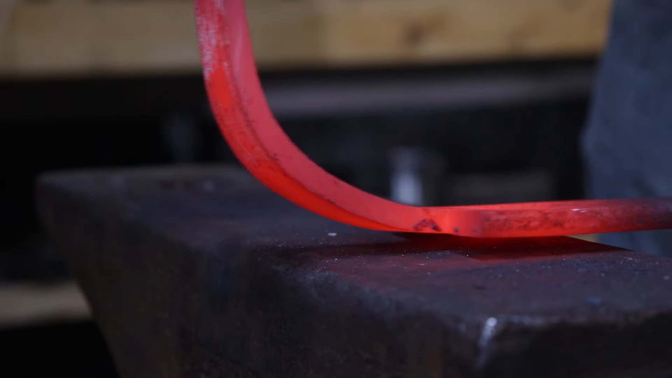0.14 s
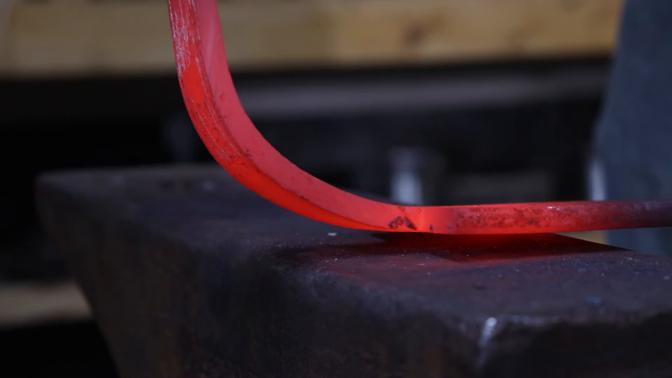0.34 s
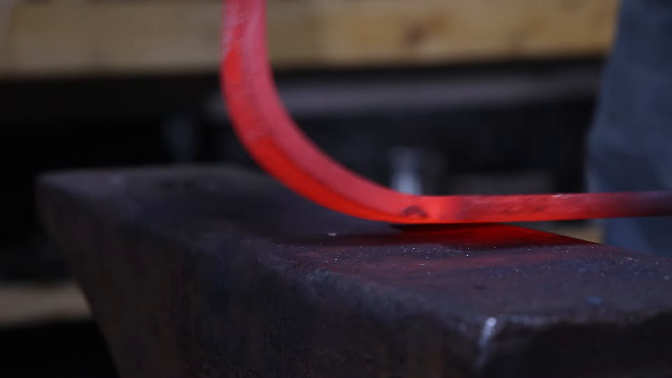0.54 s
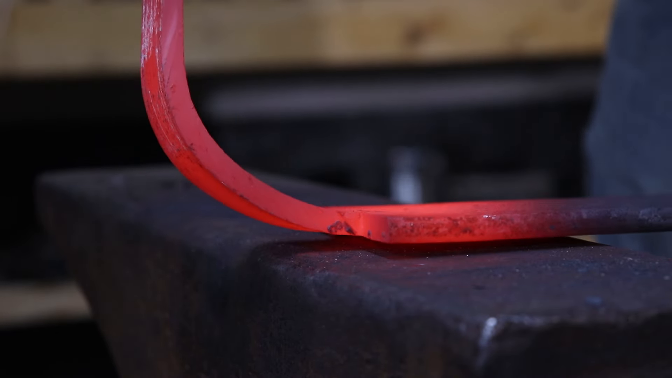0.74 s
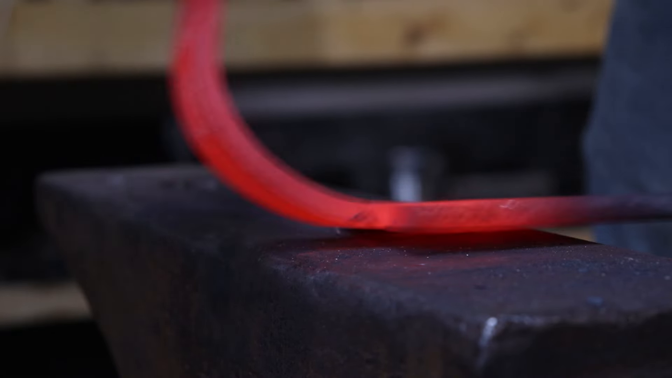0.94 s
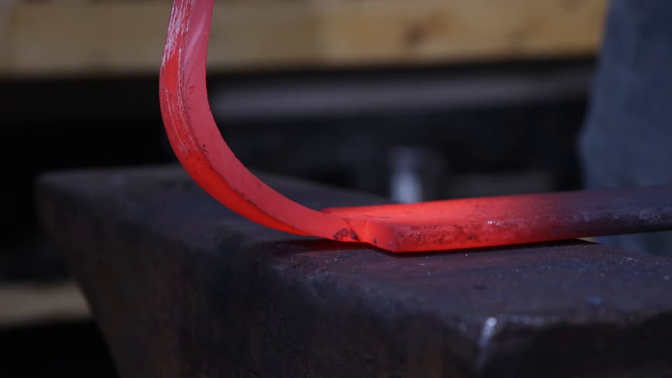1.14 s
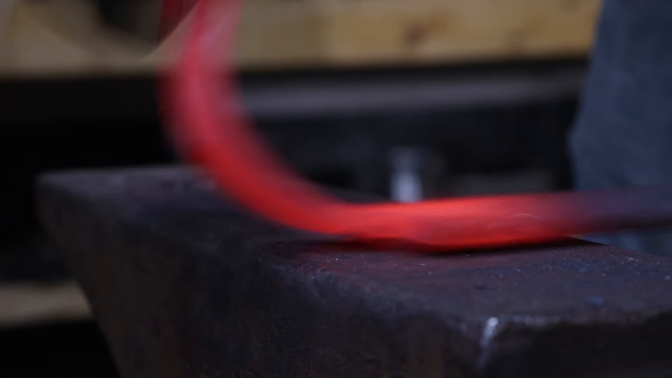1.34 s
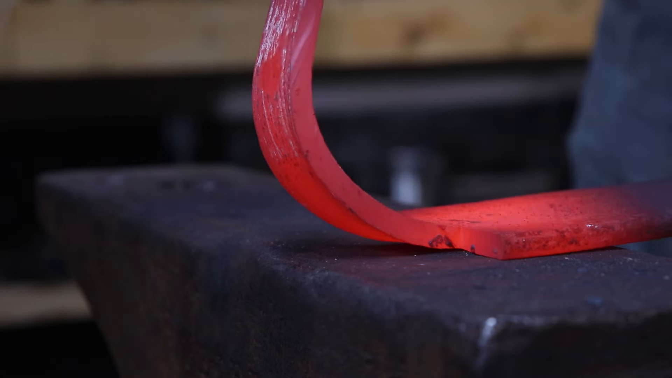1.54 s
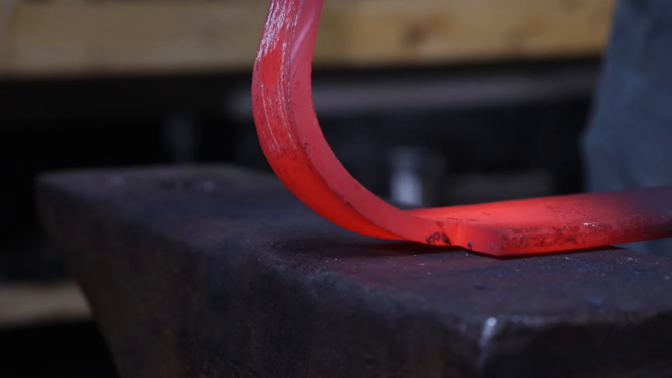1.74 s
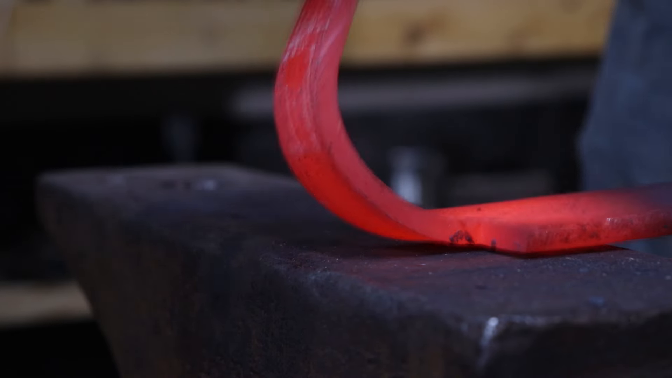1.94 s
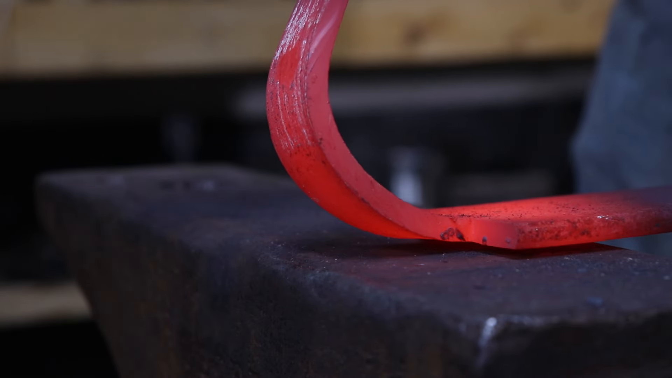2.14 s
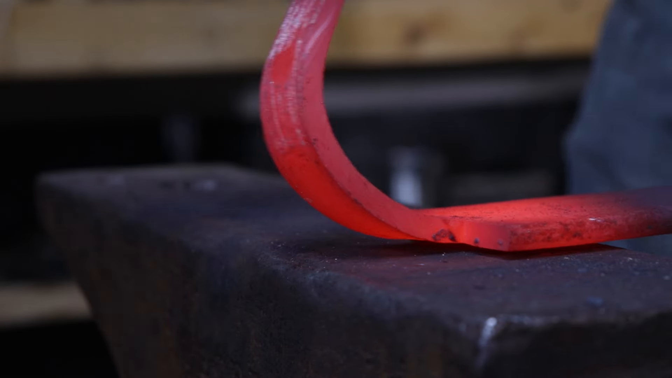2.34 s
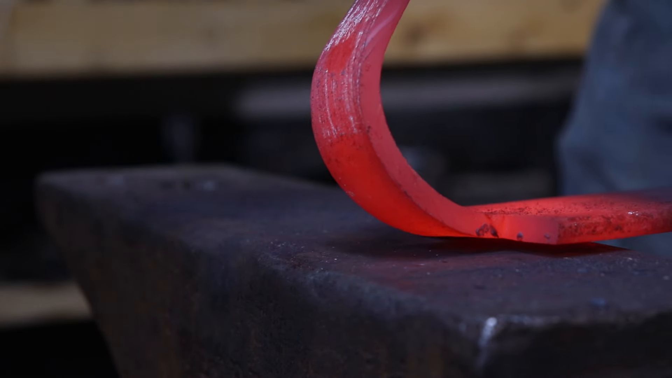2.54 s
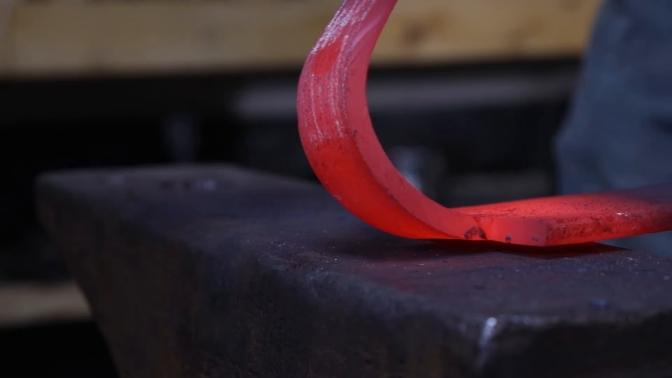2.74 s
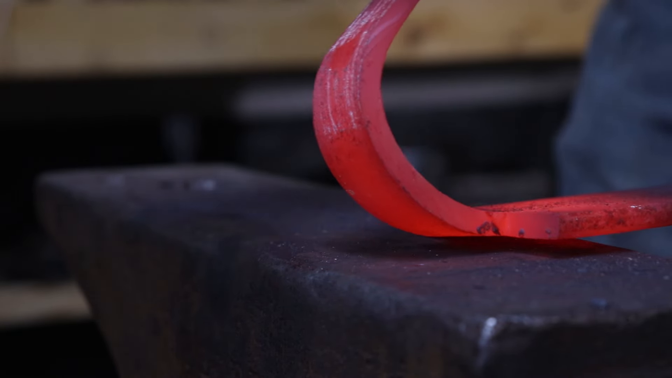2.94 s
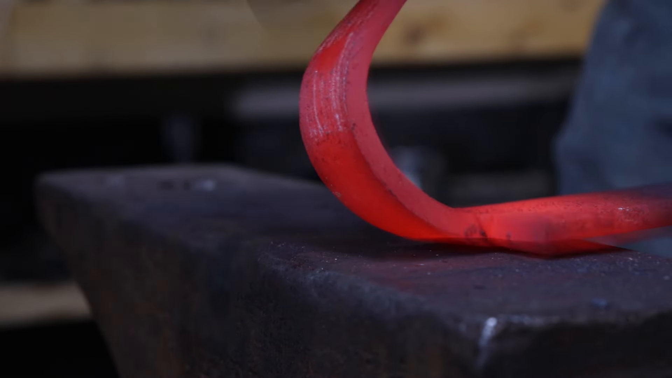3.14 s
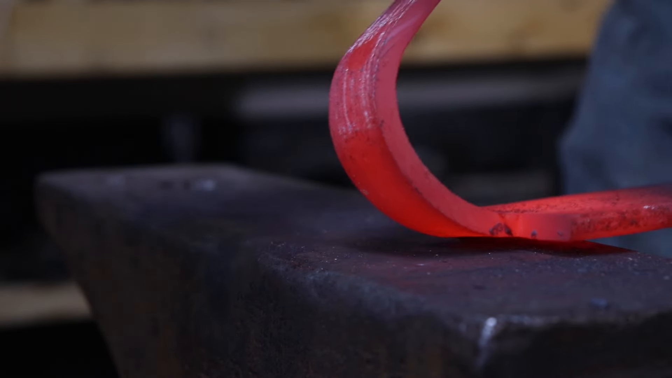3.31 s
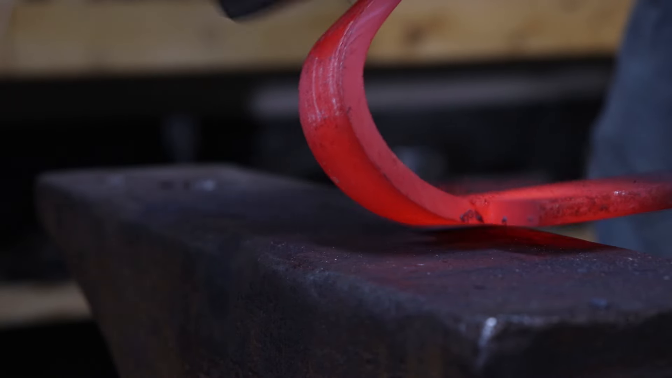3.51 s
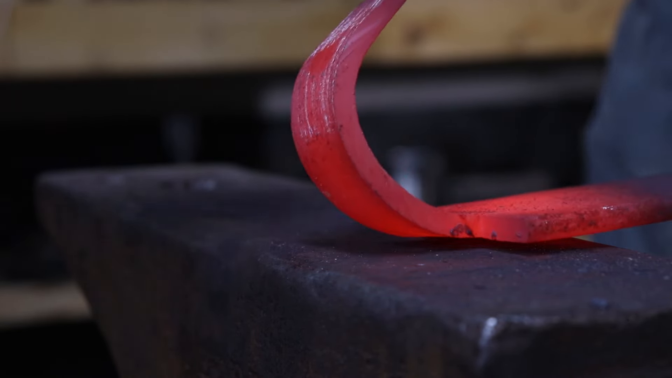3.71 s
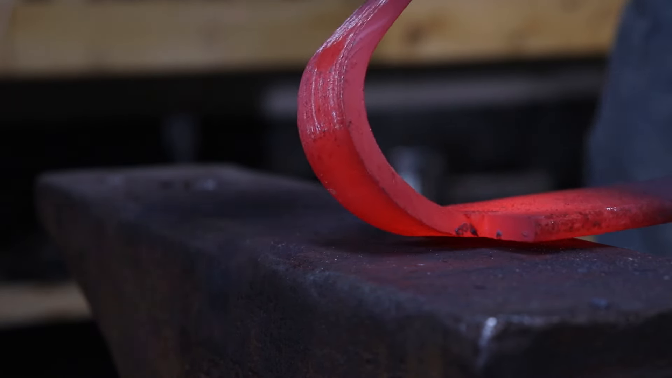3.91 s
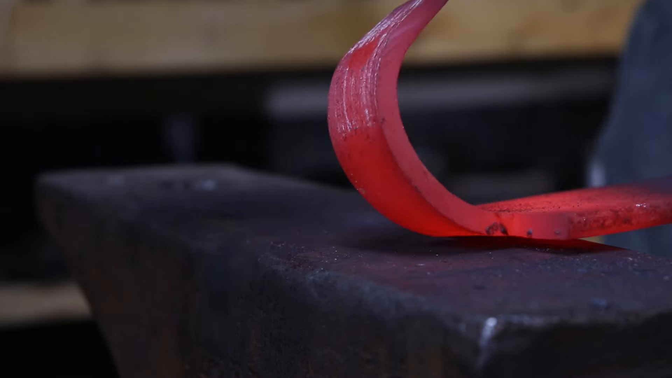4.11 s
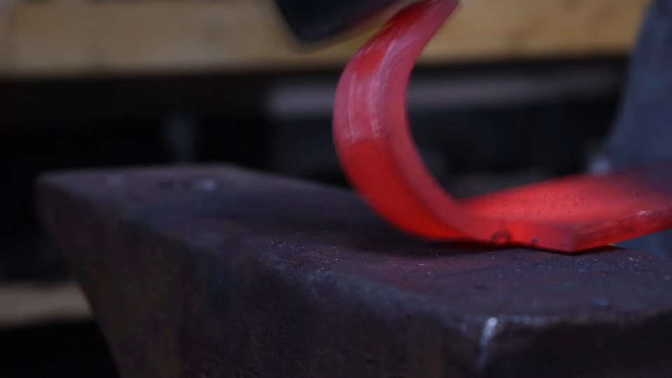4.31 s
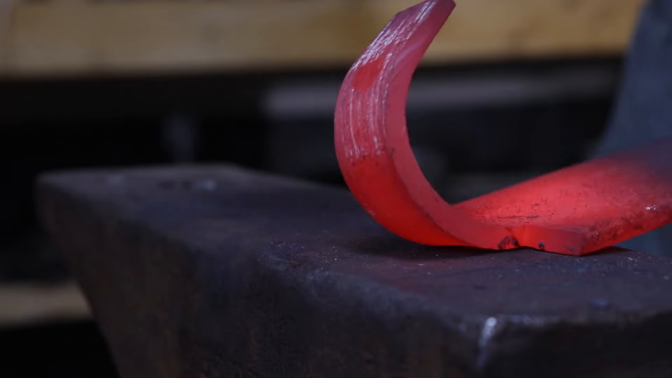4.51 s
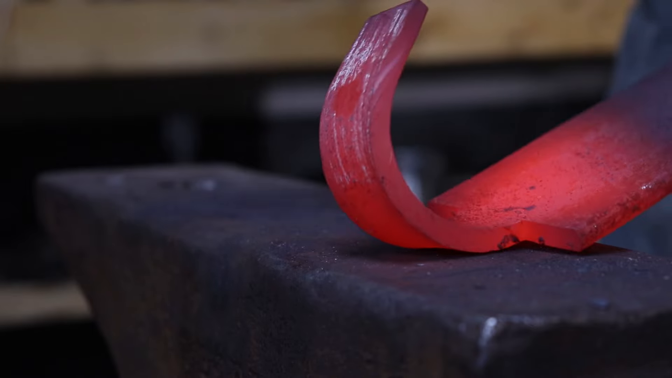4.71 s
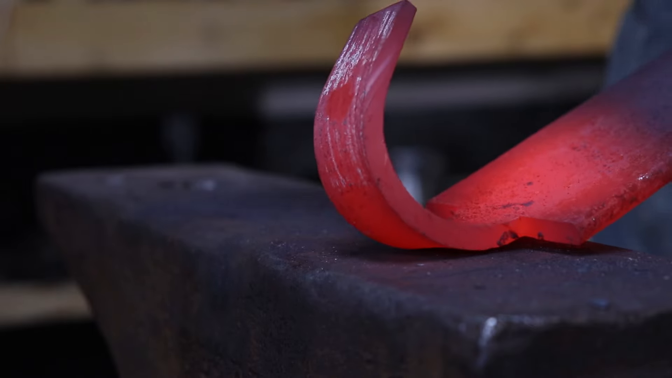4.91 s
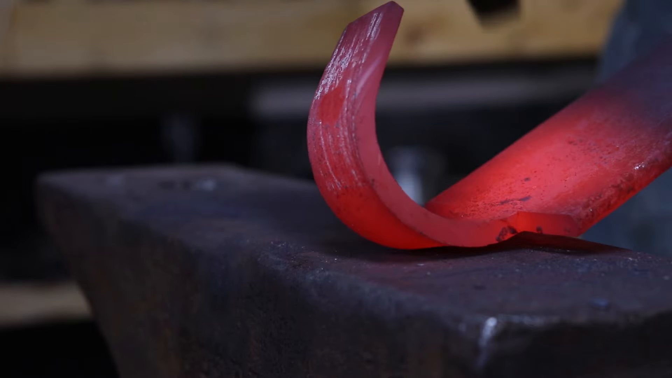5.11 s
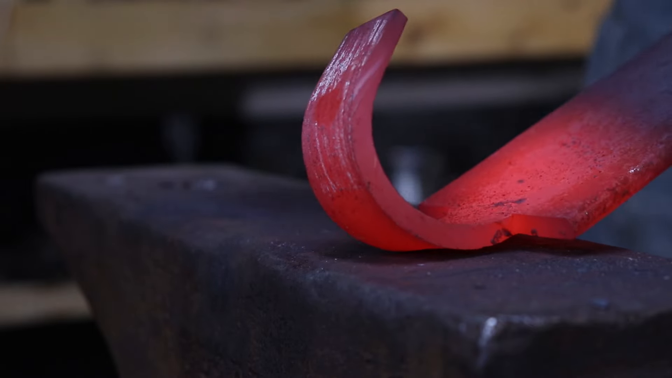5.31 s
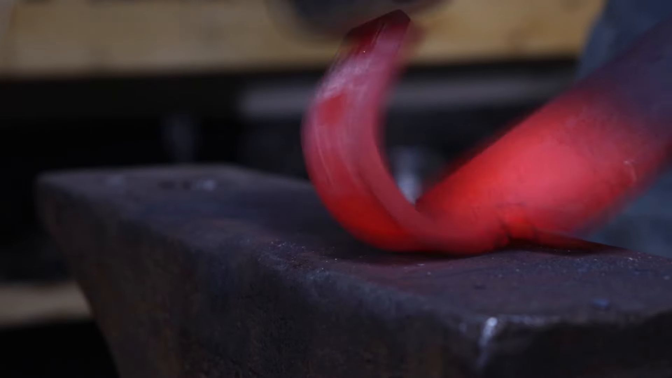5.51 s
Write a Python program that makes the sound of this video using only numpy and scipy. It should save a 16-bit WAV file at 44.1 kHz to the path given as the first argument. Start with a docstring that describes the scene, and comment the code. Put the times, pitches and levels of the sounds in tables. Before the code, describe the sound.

Close up in a small, quiet workshop with a short echo, a hammer hits steel on an anvil in a fairly even run. Every strike cracks brightly, thumps the stand and leaves a thin, high ring. The bar rattles against the anvil and softly knocks and scrapes as it is shifted. The sound cuts out for an instant on a few hits. After a brief gap with light ticks, a final blow lands with a rattle.

```python
"""A small workshop, close to one microphone: a hammer bends a hot steel bar on an anvil. Each blow is a crack,
a thud of the stand and the ring of the anvil; the bar bounces and chatters. Between blows the tongs knock and
the bar ticks and scrapes as it is moved, and the room adds short echoes. Some blows jar the microphone lead, so
that the sound drops out for a moment."""
import sys
import numpy as np
from scipy import signal
from scipy.fft import rfft, irfft
from scipy.io import wavfile

SR = 44100
rng = np.random.default_rng(int(sys.argv[2]) if len(sys.argv) > 2 else 0)


def persist_wave(psi):
    """Save psi, clipped to +-1, as 16-bit WAV."""
    counts = np.round(np.clip(psi, -1, 1) * 32767).astype(np.int16)
    wavfile.write(sys.argv[1], SR, np.atleast_2d(counts).T)


N = 245195

# Hammer blows. A fade time (t60) is how long a sound takes to fall by 60 dB.
# Each row: start in seconds, crack level in dB, thud level in dB, thud pitch in Hz, echo level in dB,
# brightness in dB per octave, dB added to the stand's high tones and taken from its low ones,
# bar pitch in Hz, boost near that pitch in dB, bar ring level in dB, anvil ring level in dB,
# anvil fade time in seconds, ring level of the anvil's horn in dB.
BLOWS = [(0.0787, -31, -42, 305, -33.5, 0, -3, 5180, 14.5, -57, -44, 0.95, -50.5),
         (.562, -20.5, -31.5, 332, -34, -1.3, -0.5, 3740, 12.5, -33.5, -55, 1.12, -48),
         (1.028, -20.5, -32.5, 241, -36, -0.3, -1, 3490, 9.5, -39, -48, 2.8, -53),
         (1.448, -21, -25.5, 260, -38, -3.5, 0.5, 4610, 7.5, -41, -58, 1.25, -44.5),
         (1.997, -20, -23, 260.5, -35, -2.5, 3, 4370, 8.5, -46, -47, 1.04, -37.5),
         (2.467, -26, -31.5, 280, -34, -2.5, 4, 4800, 10, -49, -54.5, 1.38, -51),
         (2.9051, -31, -33, 248, -37, -1.1, 1.5, 4980, 14.5, -57, -49.5, 1.33, -48),
         (3.229, -23.5, -30, 240, -40, -2, 3, 4720, 15, -40.5, -48.5, 1.05, -45.5),
         (3.554, -27.5, -33, 216, -42, -1.6, 4, 4410, -4, -57, -65, 1.1, -55),
         (4.038, -40, -51, 268, -39, 3.2, 2, 4570, 12.5, -51, -62, 2.3, -51.5),
         (4.382, -25, -29, 270, -39.5, -0.7, 4.5, 6170, 2, -46, -58.5, 1.11, -50),
         (5.207, -22.5, -22, 261, -37.5, -1.5, 2, 4790, 10, -46, -54.5, 1.85, -56.5)]
LEAD_S, BLOW_RISE_S = 0.00195, 0.0016  # the crack starts a little early and takes a moment to swell
BAR_WIDTH_HZ, BAR_FADE_S, BAR_PAIR_RATIO = 330, 0.14, 1.03


def hammer_blows():
    """Each blow makes the bar ring with two close tones, whose pitch moves as the bar bends."""
    out, t = np.zeros(N), np.arange(SR // 2) / SR
    add(out, 0, gain_of(-43) * (echoes(CRACK) + echoes(BOOM))[SR // 4:])  # an earlier blow dies away
    for s, crack_db, thud_db, thud_hz, echo_db, tilt_db, upper_db, hz, boost_db, bar_db, *_ in BLOWS:
        boom_db = -32.5 + 0.31 * thud_db  # the stand's echoes grow slowly with the thud
        sound = impact(crack_db, thud_db, thud_hz, echo_db, boom_db, tilt_db, t60=0.041,
                       bar_peaks=[(hz, BAR_WIDTH_HZ, boost_db)], rise_s=BLOW_RISE_S, upper_db=upper_db)
        add(out, s - LEAD_S, sound)
        spread = np.sqrt(BAR_PAIR_RATIO)
        pair = [(f, bar_db, BAR_FADE_S) for f in (hz / spread, hz * spread)]
        add(out, s, ring(pair, t) * swell(t, BLOW_RISE_S))
    return out


# The tone colour of steel hitting steel. Each row: frequency in Hz, level in dB.
CRACK = [(350, -31), (600, -7), (780, -17.5), (1170, -7.5), (1430, -9), (1580, -8), (1840, -11), (2390, -6),
         (2670, -6), (3340, -5.5), (7860, -13), (9810, -13), (14100, -17.5), (15700, -26), (16400, -44)]
# Short tones of hammer, tongs and anvil. Each row: pitch in Hz, width in Hz, boost in dB.
STEEL_PEAKS = [(884, 140, 0), (1170, 14, -13.5), (1545, 59, -3), (2223, 42, 0), (2970, 24, -11),
               (4290, 54, 8), (5200, 150, 4.5), (5690, 100, 4.5), (6160, 120, 2), (6600, 130, 3.5),
               (8250, 130, -5), (9290, 460, 1.5), (10680, 130, 5.5), (11700, 310, -0.5), (12970, 150, -4)]
# The tones of the anvil's stand. Each row: pitch in Hz, level in dB, fade time in seconds.
STAND_TONES = [(71, -5, 0.4), (96.9, 0.5, 0.54), (102.1, 2.5, 0.33), (291.5, -6, 0.65), (394, -6, 0.16),
               (545, 5, 0.18)]
# The tone colour of the stand's booming echoes. Each row: frequency in Hz, level in dB.
BOOM = [(71, -38), (120, -1), (167, 1), (259, -4), (388, -1.5), (489, -7.5), (534, -5.5), (651, -26.5),
        (800, -18.5), (1040, -44.5), (1760, -120)]


def impact(crack_db, thud_db, thud_hz, echo_db, boom_db, tilt_db, t60, bar_peaks, rise_s, upper_db=0):
    """One hit: the steel cracks, the stand thuds and hums, and the room echoes both."""
    t = np.arange(SR // 2) / SR
    luck = rng.standard_normal((len(STEEL_PEAKS), 2))  # where the blow lands and how the tongs hold
    steel_peaks = [(hz * (1 + 0.026 * detune), width, db + 2 * louder)
                   for (hz, width, db), (detune, louder) in zip(STEEL_PEAKS, luck)]
    wide_peaks = [(hz, width + 350, db - 4.5) for hz, width, db in bar_peaks]  # pure tones build later
    crack = noise(len(t), CRACK, tilt_db, wide_peaks)
    crack *= swell(t, rise_s) ** 2 * gain_of(-60 * t / t60)
    push, angle = t / 0.0022, 2 * np.pi * thud_hz * t
    give = (push * np.exp(1 - push / 2) / 2) ** 2  # the stand gives way for about two swings
    thud = give * (np.sin(angle) + 0.38 * np.sin(1.885 * angle))
    tones = [(hz, db + upper_db * np.sign(hz - thud_hz / 2), fade) for hz, db, fade in STAND_TONES]
    stand = ring(tones, t) * swell(t, 0.0025)
    out = gain_of(echo_db) * echoes(CRACK, tilt_db, steel_peaks + bar_peaks)
    out += gain_of(boom_db) * echoes(BOOM, 0, [(285, 26, 6.1), (412, 73, 0.67)])
    add(out, 0, gain_of(crack_db) * crack + gain_of(thud_db) * thud + gain_of(boom_db - 8) * stand)
    return out


# Sounds just after a blow. Most are the bar bouncing; the one at 4.063 s is mainly a wash of echo.
# Each row: start in seconds, crack level in dB, thud level in dB, echo level in dB.
AFTER_SOUNDS = [(0.1014, -19.5, -37.5, -39.5), (.636, -33, -57, -57.5), (1.039, -16.5, -36, -38.5),
                (1.4696, -27.5, -36, -64), (1.4804, -30.5, -54, -62), (2.9557, -23, -43.5, -45),
                (2.9784, -27.5, -48.5, -58.5), (3.2825, -21.5, -65, -47.5), (3.3045, -28.5, -54, -55),
                (3.6103, -26, -38, -49), (4.063, -48, -63, -45), (4.1029, -26.5, -38, -47),
                (5.2155, -21, -60, -50.5), (5.2501, -27.5, -51, -52)]
FACE_PEAK = (3284, 110, 8.4)  # the bar against the anvil's face: pitch in Hz, width in Hz, boost in dB


def after_sounds():
    """Chatter of the bar or lingering echo follows a blow; the softer the crack, the duller it is."""
    out = np.zeros(N)
    loudest_db = max(row[1] for row in AFTER_SOUNDS)
    for s, crack_db, thud_db, echo_db in AFTER_SOUNDS:
        sound = impact(crack_db, thud_db, thud_hz=380, echo_db=echo_db, boom_db=thud_db - 13.5,
                       tilt_db=-2, t60=0.028, bar_peaks=[FACE_PEAK], rise_s=0.0013)
        top_hz = 12000 * 2 ** (0.06 * (crack_db - loudest_db))
        add(out, s - LEAD_S / 2, signal.lfilter(*signal.butter(2, top_hz, fs=SR), sound))
    return out


# The horn's short tones, one for each pitch in HORN_HZ. Each row: level in dB, fade time in seconds.
HORN_TONES = [(-1.5, 0.57), (2.5, 0.22), (-4, 0.31)]
ANVIL_HZ, HORN_HZ = 3390, (2459, 1630, 1540)
ANVIL_FADE_S, SILENT_DB = 1.0, -99


def anvil_ring():
    """The anvil rings until the next blow presses the soft bar on its face and starts it anew."""
    out, stops = np.zeros(N), np.array([row[0] for row in BLOWS] + [N / SR + 1])
    horn_tones = np.column_stack([HORN_HZ, HORN_TONES])
    earlier = [(0.0083, -69, ANVIL_FADE_S, SILENT_DB)]  # still ringing from an earlier blow
    blows = [(row[0], *row[-3:]) for row in BLOWS]
    after = [(s, crack_db - 35.5, ANVIL_FADE_S, SILENT_DB) for s, crack_db, *_ in AFTER_SOUNDS]
    for s, ring_db, t60, horn_db in earlier + blows + after:
        next_blow_s = stops[stops > s + .005][0]
        t = np.arange(0, next_blow_s - s, 1 / SR)
        body = ring([(ANVIL_HZ, ring_db, t60)], t, offset_s=s)
        horn = gain_of(horn_db) * ring(horn_tones, t)
        soft_ends = np.minimum(np.minimum(t, t[::-1]) / 0.0028, 1)
        add(out, s, (body + horn) * soft_ends)
    return out


# Two soft knocks. Each row: start in seconds, level in dB.
KNOCKS = [(1.7826, -43), (1.799, -43.5)]
# The tongs' low tones. Each row: pitch in Hz, level in dB, fade time in seconds.
KNOCK_TONES = [(255, -10.5, 0.12), (400.6, -2, 0.16), (565, -8, 0.078), (1100, -6.5, 0.047),
               (2040, -14, .045), (2920, -16, .04)]


def tong_knocks():
    """The tongs knock: a dull tick wakes their low tones, with a little echo."""
    out, t = np.zeros(N), np.arange(SR // 4) / SR
    dull = [(100, -1), (1000, -4), (16000, -27.5)]
    peaks = [(hz, hz / 5, db + 15) for hz, db, _ in KNOCK_TONES]
    for s, db in KNOCKS:
        tick = gain_of(-5.5 - 60 * t / 0.011) * noise(len(t), dull)
        add(out, s - .0005, gain_of(db) * (ring(KNOCK_TONES, t) + tick) * swell(t, 0.00083))
        add(out, s, gain_of(db - 20.5) * echoes(dull, 0, peaks))
    return out


# Light touches. Each row: start in seconds, level in dB, pitch in Hz, fade time in seconds,
# tick level in dB compared with the ring.
TOUCHES = [(3.718, -30, 4110, 0.0058, -12), (4.669, -54.5, 3610, .047, 5), (4.885, -68, 3800, 0.0051, 11),
           (4.898, -76, 4040, 0.0062, 5), (4.971, -65.5, 11500, .009, -3.5),
           (4.995, -63.5, 11800, 0.017, 10.5), (5.019, -54.5, 534, .026, -23),
           (5.164, -83, 5900, 0.0066, 10.5)]


def light_touches():
    """Bar or tongs touch lightly: a tick and one short ring each, with a little echo."""
    out, t = np.zeros(N), np.arange(SR // 8) / SR
    thin = [(100, -15.5), (1000, 3), (16000, -6)]
    for s, db, hz, t60, tick_db in TOUCHES:
        tick = gain_of(tick_db - 60 * t / 0.0056) * noise(len(t), thin, 0, [(hz, hz / 2, 6)])
        add(out, s - .0005, gain_of(db) * (ring([(hz, 0, t60)], t) + tick) * swell(t, 0.00049))
        add(out, s, gain_of(db - 29) * echoes(thin, 0, [(hz, hz / 4, -4 - tick_db)]))
    return out


# Faint scrapes. Each row: start in seconds, length in seconds, level in dB.
SCRAPES = [(0.444, 0.17, -68), (0.936, 0.12, -68), (1.39, .095, -74.5), (1.942, .083, -67),
           (2.382, 0.13, -73.5), (2.822, 0.096, -76), (3.438, 0.14, -73), (4.617, 0.12, -72.5),
           (4.978, 0.058, -79.5)]
# The tone colour of scraping. Each row: frequency in Hz, level in dB.
SCRAPE_COLOUR = [(88, -64), (150, -36), (294, -11.5), (416, -14), (661, -8.5), (787, -35), (1250, -13),
                 (1510, -21.5), (2140, -10), (3750, -15.5), (4120, -8), (5300, -15), (5720, -32.5),
                 (6810, -14.5), (15000, -23.5)]


def bar_scrapes():
    """Shifting the bar gives soft swells of hiss that make the steel shimmer."""
    out = np.zeros(N)
    for s, length, db in SCRAPES:
        size = round(length * SR)
        luck = rng.standard_normal(len(STEEL_PEAKS))
        shimmer = [(hz, width / 2, boost + 5 + 4 * louder)
                   for (hz, width, boost), louder in zip(STEEL_PEAKS, luck)]
        hiss = noise(size, SCRAPE_COLOUR, tilt_db=-3, peaks=shimmer)
        add(out, s, gain_of(db) * hiss * signal.windows.tukey(size, .8))
    return out


# How long the workshop echoes. Each row: frequency in Hz, fade time in seconds.
ECHO_FADES = [(60, 0.43), (160, 0.48), (420, 0.49), (1100, 0.52), (2900, 0.55), (7700, 0.48), (15000, 0.32)]


def echoes(points, tilt_db=0, peaks=()):
    """Echoes of a hit thicken into a wash of noise; each frequency dies at its own speed."""
    size = SR * 3 // 4
    hz, t, bands = signal.stft(noise(size, points, tilt_db, peaks), SR, nperseg=512)
    fade = gain_of(-60 * t / look_up(ECHO_FADES, hz)[:, None])
    fade += gain_of(-41 - 60 * t / 0.2)  # a faint, quick tail at all frequencies
    fade *= signal.windows.tukey(2 * len(t), .3)[len(t):]
    tail = signal.istft(bands * fade, SR, nperseg=512)[1][:size]
    return tail * swell(np.arange(size) / SR, 0.011)


# The tone colour of the quiet workshop. Each row: frequency in Hz, level in dB.
AIR_COLOUR = [(18, -45.5), (40, -15), (95, 7), (160, -2.5), (400, -7.5), (900, -19), (2000, -21),
              (3500, -20), (8000, -25.5), (16000, -37)]


def room_air():
    """A very faint, steady rumble and hiss."""
    return gain_of(-76.5) * noise(N, AIR_COLOUR)


def noise(size, points, tilt_db=0, peaks=()):
    """Noise of power 1 with a tone colour, a tilt in dB per octave and peaks (Hz, width in Hz, dB)."""
    hz = np.fft.rfftfreq(size, 1 / SR)
    db = look_up(points, hz) + tilt_db * np.log2((hz + 50) / 3000)
    boost = 1 + sum(gain_of(d) / (1 + (2 * (hz - f) / width) ** 2) for f, width, d in peaks)
    colour = unit_power(gain_of(db) * boost)
    return unit_power(irfft(rfft(rng.standard_normal(size)) * colour, size))


def ring(tones, t, offset_s=0):
    """Pure tones that die away, as struck metal does; the offset shifts the waves, not the fade."""
    return sum(gain_of(db - 60 * t / t60) * np.sin(2 * np.pi * hz * (t + offset_s))
               for hz, db, t60 in tones)


def swell(t, rise_s):
    """A smooth rise from 0 towards 1."""
    return 1 - np.exp(-t / rise_s)


def gain_of(db):
    """Turns dB into a number to multiply by."""
    return 10 ** (np.asarray(db) / 20)


def unit_power(x):
    """Scales a signal to an average power of 1."""
    return x / np.sqrt(np.mean(x ** 2) + 1e-20)


def look_up(points, hz):
    """Reads between a table's rows, with frequency spaced by octaves."""
    f, value = np.transpose(points)
    return np.interp(np.log(hz + 1), np.log(f + 1), value)


def add(mix, s, sound):
    """Mixes a sound in at s seconds."""
    part = mix[max(round(s * SR), 0):][:len(sound)]
    part += sound[:len(part)]


def scene():
    """All sources over the quiet air of the workshop, the same in both channels."""
    forging = hammer_blows() + after_sounds() + anvil_ring()
    handling = tong_knocks() + light_touches() + bar_scrapes()
    mono = forging + handling + room_air()
    return np.array([mono, mono])


# Gaps in the sound. Each row: start in seconds, end in seconds, depth in dB, recovery time in seconds.
DROPOUTS = [(.081, 0.0862, -43, 0.00058), (2.0121, 2.0769, -57.5, 0.048), (2.4674, 2.474, -47, 0.00087),
            (2.9066, 2.9092, -50.5, 0.0023), (4.0403, 4.047, -43, 0.00046)]
BASS_CUT_HZ, TREBLE_CUT_HZ = 60, 16400


def record(dry):
    """The jarred microphone lead drops the sound briefly; deep bass and the highest treble are cut."""
    t, db = np.arange(N) / SR, np.zeros(N)
    for s, end, depth_db, recovery_s in DROPOUTS:  # a sudden fall, a hold, a step up and a fade back
        db += np.interp(t, [s - .0002, s + 0.0005, s + 0.001, end - .001, end, end + recovery_s],
                        [0, -20, depth_db, depth_db, -9, 0])
    bass_cut = signal.butter(2, BASS_CUT_HZ, "high", fs=SR, output="sos")
    treble_cut = signal.firwin(511, TREBLE_CUT_HZ, window=("kaiser", 9), fs=SR)
    thinned = signal.sosfilt(bass_cut, dry * gain_of(db))
    return signal.oaconvolve(thinned, treble_cut[None], "same")


dry = scene()
out = record(dry)
persist_wave(out)
```